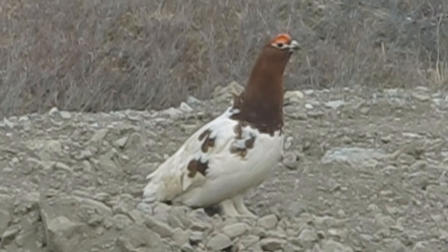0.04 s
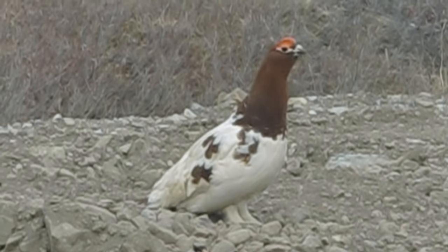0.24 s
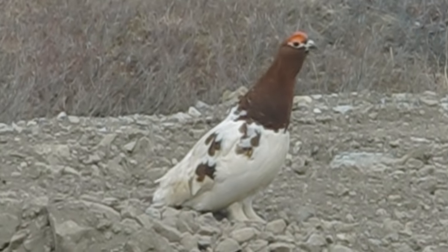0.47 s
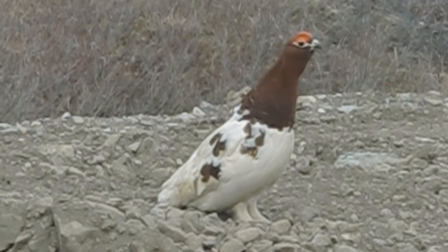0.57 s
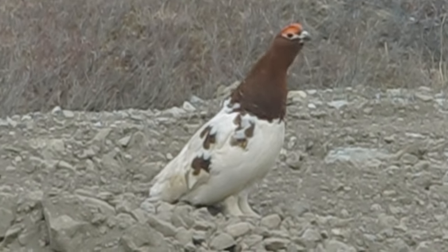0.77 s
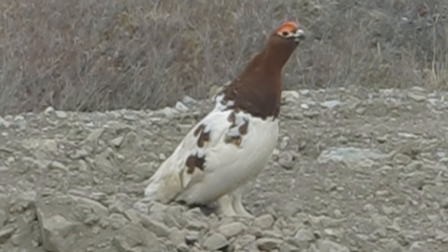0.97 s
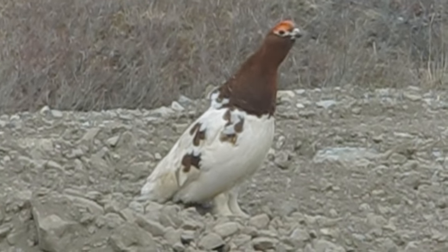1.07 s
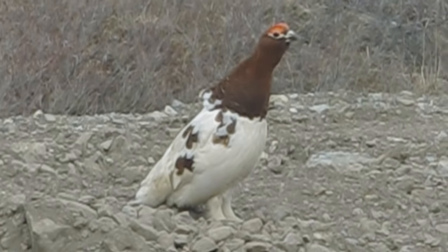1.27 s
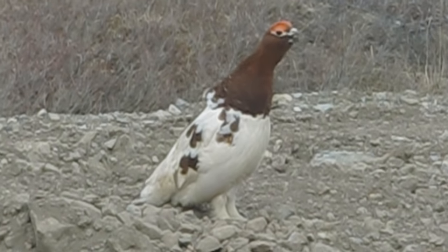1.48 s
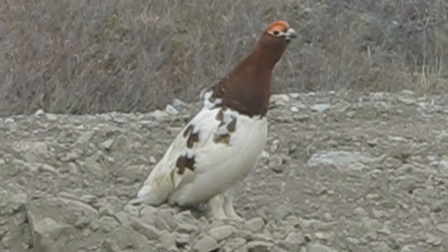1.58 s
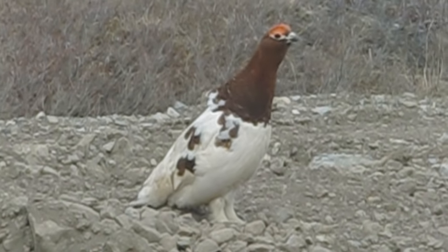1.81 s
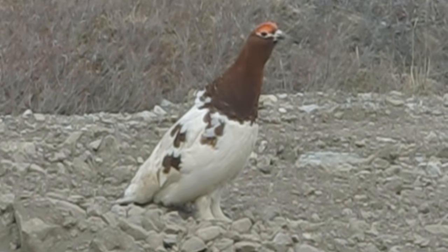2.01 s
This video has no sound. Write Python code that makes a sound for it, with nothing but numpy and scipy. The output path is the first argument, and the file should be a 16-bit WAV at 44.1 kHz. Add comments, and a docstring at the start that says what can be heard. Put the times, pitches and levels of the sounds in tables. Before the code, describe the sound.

A ptarmigan calls in raspy, clipped croaks that grow brighter and faster until they form a rattle. Behind it, light air hisses and softly bumps the microphone in an open, rocky place with barely any echo.

```python
"""A ptarmigan on open stony ground gives seventeen croaks that speed up into a rattle.
Each croak is a handful of sharp pulses ringing the bird's throat; as the throat opens, its first
main resonance (a pitch it likes to ring at) climbs to meet the second near 2 kHz.
Nearby stones scatter the call and a far slope returns a faint echo. Light air hisses, rumbles
and bumps the microphone, and one faint tick comes before the call."""
import sys
import numpy as np
from scipy import signal
from scipy.fft import rfft, irfft, next_fast_len
from scipy.io import wavfile
from scipy.ndimage import map_coordinates

SR = 44100
rng = np.random.default_rng(int(sys.argv[2]) if len(sys.argv) > 2 else 0)


def generate_wav(sig):
    """Save sig (samples, or channels by samples) to the path in sys.argv[1] as 16-bit PCM at SR."""
    pcm = np.round(np.clip(np.atleast_2d(sig).T, -1, 1) * 32767).astype(np.int16)
    wavfile.write(sys.argv[1], SR, pcm)


N = 90404

# Tone of the air's hiss (frequency [Hz], relative level [dB])
HISS_SPECTRUM = [(120, -30), (200, -9), (340, -14.5), (440, -11), (482, -11), (722, -13), (1300, -14),
                 (1980, -16.5), (3490, -23), (16000, -28.5)]
# Tone of the air's rumble (frequency [Hz], relative level [dB])
RUMBLE_SPECTRUM = [(12, -2), (22, -3.5), (40, 0), (65, -8), (113, -10.5), (250, -21), (500, -30.5),
                   (1500, -47)]
# Hiss and rumble dip briefly, then come back slightly louder and hold there (time [s], level [dB])
AIR_DIP = [(.03, -5.5), (.06, -12.5), (0.089, -29), (0.098, -3.5)]
# Tones of the tick (frequency [Hz], level [dB], time to fade by 60 dB [s])
TICK_TONES = [(550, -43.5, 0.067), (2270, -48, 0.039), (3000, -53, .015)]
# Pushes of air on the microphone (time [s], level [dB], frequency [Hz], width [s])
AIR_BUMPS = [(0.101, -32, 37.4, 0.0033), (0.873, -37, 110, 0.004), (0.933, -40.5, 68, 0.006),
             (1.141, -36.5, 128, 0.0035), (1.5, -29.5, 173, 0.0014), (1.552, -30, 144, 0.0026),
             (1.655, -21, 113.2, 0.0036), (1.657, -26, 286.1, 0.0038), (1.70, -30, 167, 0.0026),
             (1.769, -29, 219, 0.001), (1.794, -25.5, 189.4, 0.00098)]
# The croaks; the weak second row is a tail to the first (start [s], length [s], peak pitch [Hz],
# level [dB], throat opening at start [0-1], at end [0-1], second resonance halfway through [Hz],
# treble tilt [dB], fade over the croak [dB])
CROAK_RUN = [ (0.1885, 0.048, 159, -16.5, 0.19, 0.11, 3010, -2, 9),
             (0.241, .082, 118.6, -32.5, 0.04, 0.06, 2650, -29, 13),
             (0.4038, 0.055, 166.5, -15, 0, 0.55, 2730, -2, 8.5),
             (0.5461, 0.047, 182, -13, 0.02, 0.68, 2427, -2, 2),
             (.6662, 0.05, 194.8, -13.5, 0.06, 0.78, 2313, 0, 3.5),
             (0.7799, 0.051, 203.9, -14, 0.2, 0.86, 2265, 0.5, 10),
             (0.887, 0.045, 206.5, -12, 0.21, 0.95, 2276, -0.5, 8),
             (0.99, 0.049, 210.2, -12, 0.31, 0.93, 2230, -1.5, 8),
             (1.088, 0.048, 215.9, -12, 0.38, 0.97, 2236, -2.5, 8),
             (1.1833, 0.049, 214.9, -11.5, 0.32, 0.96, 2210, -2.5, 1.5),
             (1.2749, 0.044, 216, -11, 0.58, 1, 2210, -1, 10.5),
             (1.3568, 0.04, 217.4, -9.5, 0.73, 0.99, 2200, 0, 1),
             (1.429, .0389, 211.4, -11, 0.86, 0.99, 2220, 0.5, 10),
             (1.491, 0.039, 202.3, -11, 0.95, 0.96, 2194, 0.5, 15),
             (1.548, .0366, 196.7, -11.5, 0.93, 0.99, 2231, 0.5, -2),
             (1.6068, 0.035, 190.5, -11, 1, 1, 2230, 0.5, 2.5),
             (1.6666, 0.037, 186.2, -11.5, 0.92, 1, 2205, 1, 5.5),
             (1.73, 0.041, 175.6, -13, 0.71, 0.99, 2225, 0.5, 2.5)]
# Pitch rises and sags in a croak (progress [0-1], share of peak pitch [0-1])
CROAK_PITCH = [(0, .58), (.25, .76), (.5, 1), (.75, .84), (1, .41)]
# How hard the pulses push in a croak (progress [0-1], force [dB])
CROAK_FORCE = [(0, -17.5), (.17, -5.5), (.35, -1), (.5, 1), (.65, -1.5), (.85, -7), (1, -1.5)]
# Low throat resonances; the last is the main one that climbs (frequency closed [Hz], half open [Hz],
# open [Hz], level closed [dB], half open [dB], open [dB], time to fade by 60 dB [s])
LOW_RESONANCES = [(553, 560, 570, -14.5, -16.5, -21, 0.022), (858, 788, 742, -4.5, -14, -15, .032),
                  (1097, 1487, 1952, -3, -6, 2, 0.02)]
# Strength of the second main resonance (level closed [dB], half open [dB], open [dB])
SECOND_LEVELS = [-1.5, -4.5, 3]
# High throat resonances (frequency closed [Hz], half open [Hz], open [Hz],
# level closed [dB], half open [dB], open [dB], time to fade by 60 dB [s])
HIGH_RESONANCES = [(4690, 4150, 3830, -31, -11.5, -19, 0.024), (5200, 4450, 5541, -9, -16.5, -14.5, 0.013),
                   (5480, 6670, 7000, -24, -7.5, -39.5, 0.02), (7060, 6940, 8603, -19.5, -17, -26.5, 0.025),
                   (9600, 8500, 8900, -28, -19.5, -39.5, 0.019),
                   (11750, 12000, 15000, -32, -19, -36, 0.024)]
# Tone of each pulse's rasp (frequency [Hz], relative level [dB])
RASP_SPECTRUM = [(250, -16), (500, -19.5), (1200, 0), (2300, -0.5), (3100, -65.5), (4500, 5), (6200, -7.5),
                 (7700, -28.5), (9000, 2.5), (12500, -5), (16000, -13)]

HISS_DB, RUMBLE_DB, GUST_DB = -52, -46, -1
OPENS_FROM, OPENS_BY = 0.048, 0.65  # shares of the croak's length
SECOND_DROP = 0.14  # share by which the second resonance falls over a croak
BRIGHTENS = 0.99  # dB of treble tilt per dB of force: weak pulses are darker
TILT_PIVOT_HZ, TILT_OCTAVES = 795, 1.8  # the tone tips like a seesaw, this far to each side
JITTER_S, FORCE_SCATTER_DB, DETUNE = 0.00005, 1.15, 0.011  # no two pulses are quite alike
ATTACK_S, SECOND_FADE_S = 0.00013, 0.018
RASP_DB, RASP_FADE_S = -23, 0.014
BASS_CUT_HZ, TOP_HZ = 497, 16100
GROUND_DELAY_S, GROUND_SHARE = 0.000775, 0.05


def amp(db):
    """Turn decibels into a number to multiply by."""
    return 10 ** (np.asarray(db) / 20)


def unit(x):
    """Scale a sound to an average (rms) strength of 1."""
    return x / np.sqrt(np.mean(x ** 2) + 1e-20)


def fall(t, fade_s):
    """A smooth fade that loses 60 dB every fade_s seconds."""
    return np.exp(-np.log(1000) * t / fade_s)


def filtered(x, response):
    """Multiply each frequency in a sound by response(hz)."""
    size = next_fast_len(N + SR // 2)
    return irfft(rfft(x, size) * response(np.fft.rfftfreq(size, 1 / SR)), size)[:N]


def noise(spectrum):
    """Noise of strength 1, with its tone set by a table."""
    freqs, db = np.transpose(spectrum)
    gain = lambda hz: amp(np.interp(np.log(hz + 1), np.log(freqs + 1), db))
    return unit(filtered(rng.standard_normal(N), gain))


def wobble(rate):
    """A smooth curve through `rate` random points a second."""
    points = rng.standard_normal(int(N * rate / SR) + 4)
    return map_coordinates(points, [np.arange(N) * rate / SR])


def air():
    """Light air makes an even hiss and a gusty rumble; both dip briefly near the start."""
    dip = amp(np.interp(np.arange(N) / SR, *np.transpose(AIR_DIP)))
    hiss = amp(HISS_DB) * noise(HISS_SPECTRUM)
    rumble = amp(RUMBLE_DB) * unit(noise(RUMBLE_SPECTRUM) * amp(GUST_DB * wobble(9.5)))
    return dip * (hiss + rumble)


def tick(start_s=0.019):
    """One faint hollow tick: three tones that die away fast."""
    t = np.maximum(np.arange(N) / SR - start_s, 0)
    return sum(amp(db) * fall(t, fade_s) * np.sin(2 * np.pi * hz * t) for hz, db, fade_s in TICK_TONES)


def bumps():
    """Air pushes on the microphone: each soft bump is a low tone that swells and is gone."""
    t = np.arange(N) / SR
    return sum(amp(db) * np.exp(-.5 * ((t - at) / width) ** 2) * np.cos(2 * np.pi * hz * (t - at))
               for at, db, hz, width in AIR_BUMPS)


def pulse_places(length, pitch_hz):
    """Where pulses fall in a croak, from 0 to 1: one for each cycle of its changing pitch."""
    progress = np.linspace(0, 1, 400)
    pulse_rate = pitch_hz * np.interp(progress, *np.transpose(CROAK_PITCH))
    cycles = np.cumsum(pulse_rate) * length / len(progress)
    return np.interp(np.arange(0, cycles[-1] - cycles[0]), cycles - cycles[0], progress)


def throat(t, opening, second_hz, treble_db):
    """One pulse rings the throat: fading tones that depend on how far it is open."""
    blend = lambda values: np.interp(opening, [0, .5, 1], values)
    tuned = lambda rows: [(blend(row[:3]), blend(row[3:6]), row[-1]) for row in rows]
    second = (second_hz, blend(SECOND_LEVELS), SECOND_FADE_S)
    resonances = tuned(LOW_RESONANCES) + [second] + tuned(HIGH_RESONANCES)
    signs = [-1, -1, 1, -1, 1, -1, 1, -1, 1, -1]  # most neighbours swing in opposite directions
    ring = np.zeros(len(t))
    for sign, (hz, db, fade_s) in zip(signs, resonances):
        tilt_db = treble_db * np.clip(np.log2(hz / TILT_PIVOT_HZ) / TILT_OCTAVES, -1, 1)
        tone = np.sin(2 * np.pi * hz * (1 + DETUNE * rng.normal()) * t)
        ring += sign * amp(db + tilt_db) * fall(t, fade_s) * tone
    return ring * (1 - np.exp(-t / ATTACK_S))


def ptarmigan():
    """The croaks: every pulse rings the throat and lets out a short puff of rasp."""
    voice, puffs, size = np.zeros(N), np.zeros(N), SR // 30
    for start, length, pitch_hz, db, open_start, open_end, second_hz, treble_db, fade_db in CROAK_RUN:
        for progress in pulse_places(length, pitch_hz):
            pulse_s = start + progress * length + JITTER_S * rng.normal()
            i = int(pulse_s * SR) + 1
            t = (i + np.arange(size)) / SR - pulse_s
            moved = np.clip((progress - OPENS_FROM) / (OPENS_BY - OPENS_FROM), 0, 1)
            opening = open_start + (open_end - open_start) * np.sin(np.pi / 2 * moved) ** 2
            force_db = np.interp(progress, *np.transpose(CROAK_FORCE))
            strength = amp(db + force_db - fade_db * (progress - .5) + FORCE_SCATTER_DB * rng.normal())
            bright_db = treble_db + BRIGHTENS * force_db
            glide = 1 - SECOND_DROP * (progress - .5)
            voice[i:i + size] += strength * throat(t, opening, second_hz * glide, bright_db)
            puffs[i:i + size] += strength * amp(RASP_DB + bright_db) * fall(t, RASP_FADE_S)
    return voice + puffs * noise(RASP_SPECTRUM)


def small_body(hz):
    """A filter: the bird's small body sends out very little bass."""
    ratio = hz / BASS_CUT_HZ
    return -ratio ** 2 / (1 + 1j * ratio - ratio ** 2)


def ground_bounce(hz):
    """A filter: the ground adds a weak, slightly late copy of the call."""
    return 1 + GROUND_SHARE * np.exp(-2j * np.pi * hz * GROUND_DELAY_S)


def scatter(x, delay_s, fade_s):
    """Rough ground throws the sound back late, smeared into a short fading tail."""
    t = np.arange(SR // 4) / SR
    tail = rng.standard_normal(len(t)) * fall(np.abs(t - delay_s), fade_s) * (t > delay_s)
    return signal.fftconvolve(x, tail / np.linalg.norm(tail))[:N]


def scene():
    """Mix the air, the tick, the bird and its echoes into one channel."""
    bird = filtered(ptarmigan(), lambda hz: small_body(hz) * ground_bounce(hz))
    stones = amp(-12) * scatter(bird, delay_s=0.0022, fade_s=0.03)
    far_slope = amp(-31) * scatter(bird, delay_s=0.105, fade_s=0.03)
    return (air() + tick() + bumps() + bird + stones + far_slope)[None]


def record(dry):
    """Cut away the highest treble, above TOP_HZ."""
    return filtered(dry[0], lambda hz: hz < TOP_HZ)[None]


dry = scene()
out = record(dry)
generate_wav(out)
```